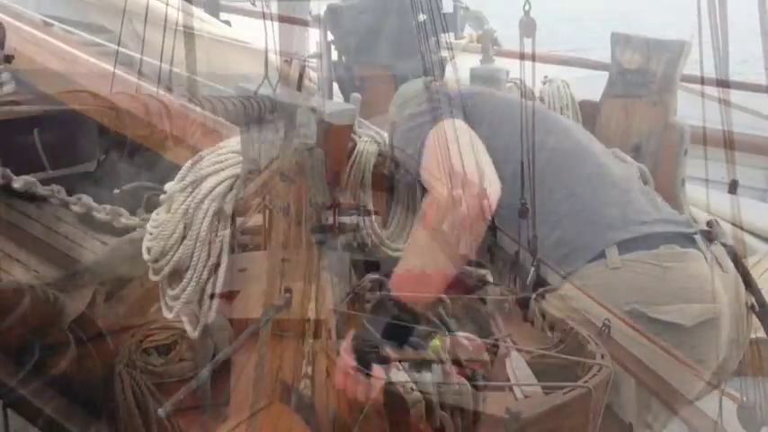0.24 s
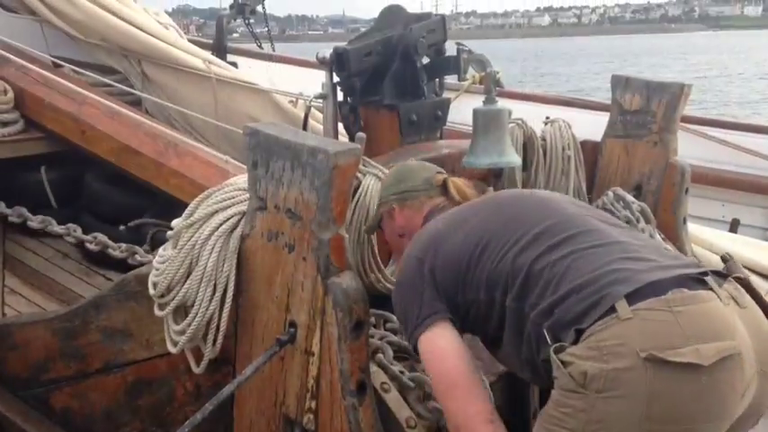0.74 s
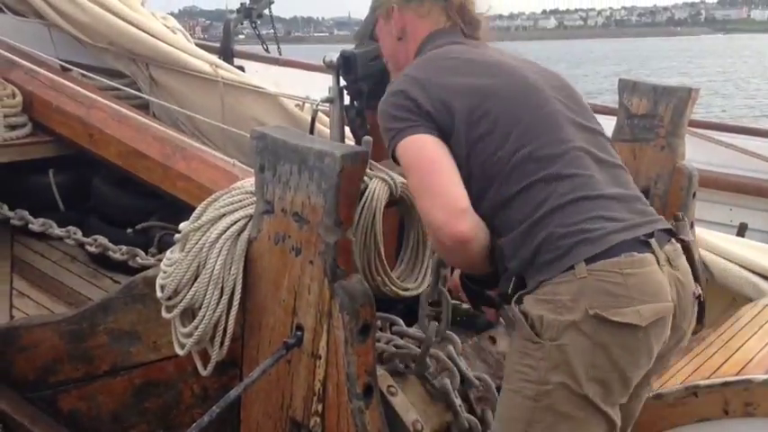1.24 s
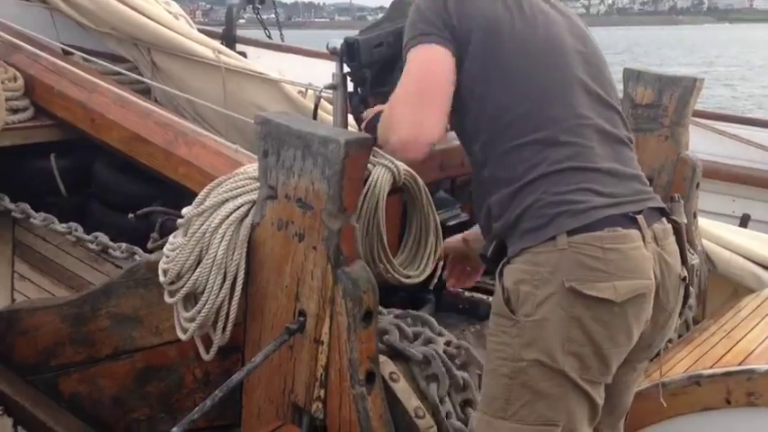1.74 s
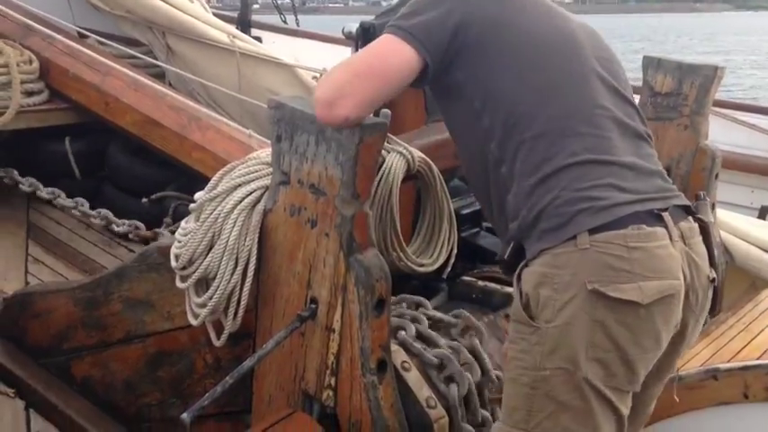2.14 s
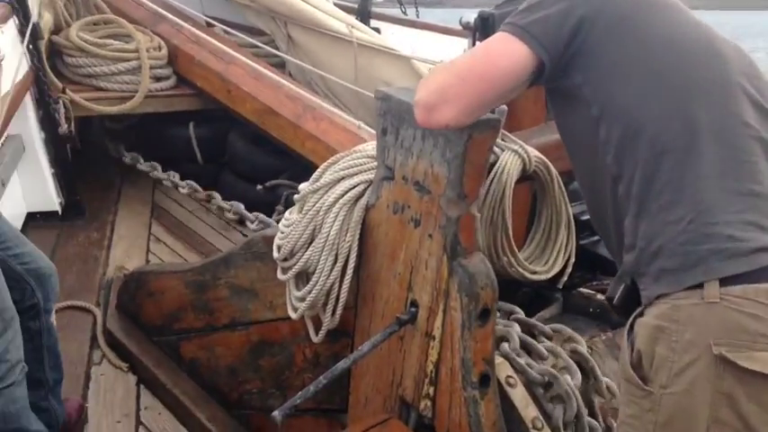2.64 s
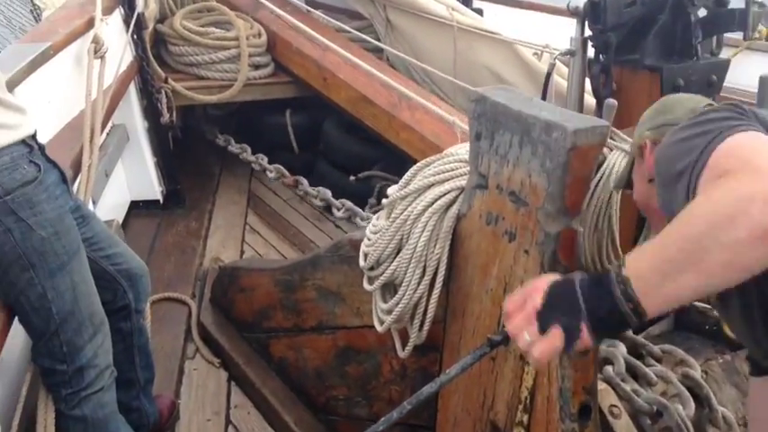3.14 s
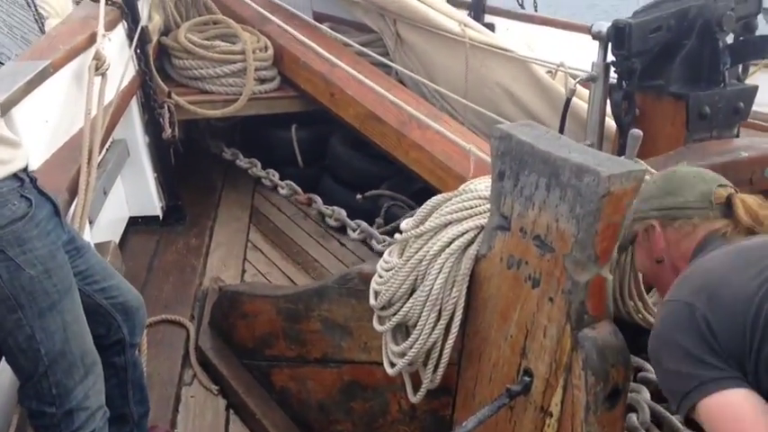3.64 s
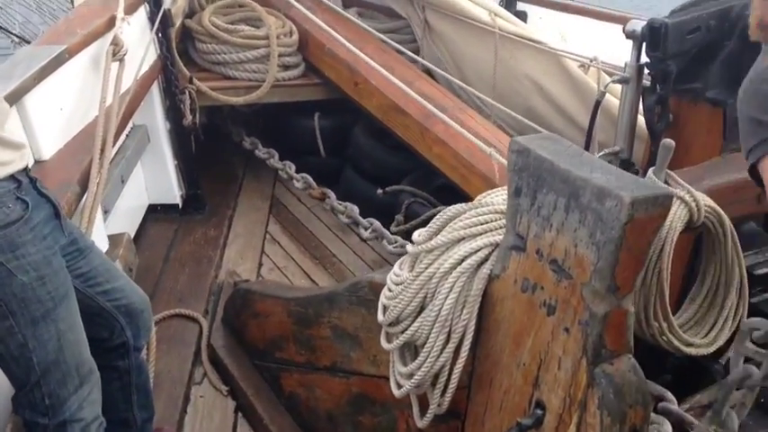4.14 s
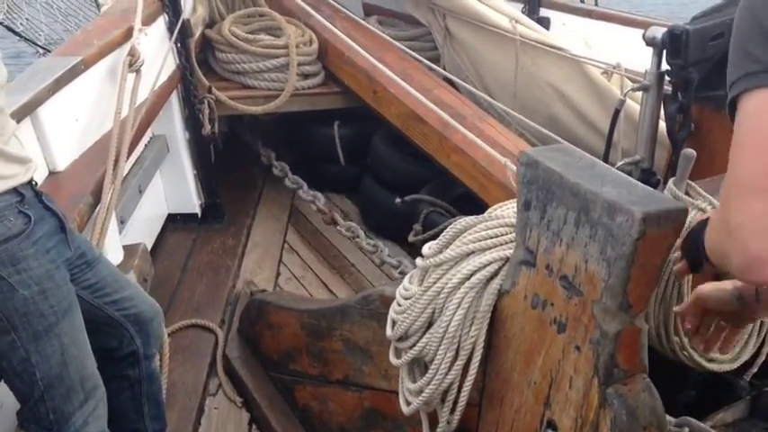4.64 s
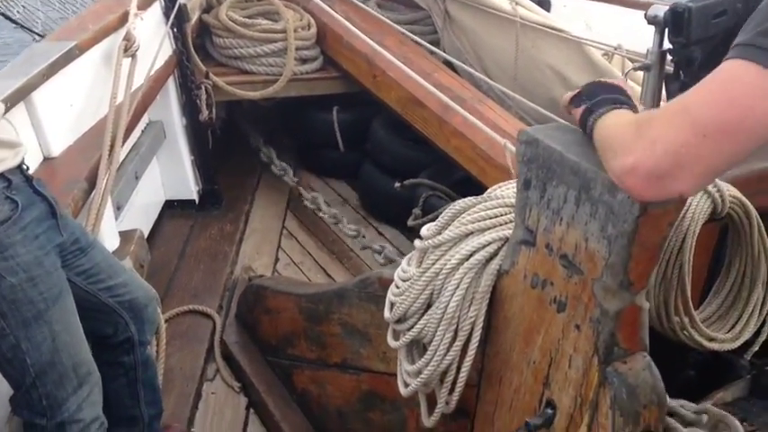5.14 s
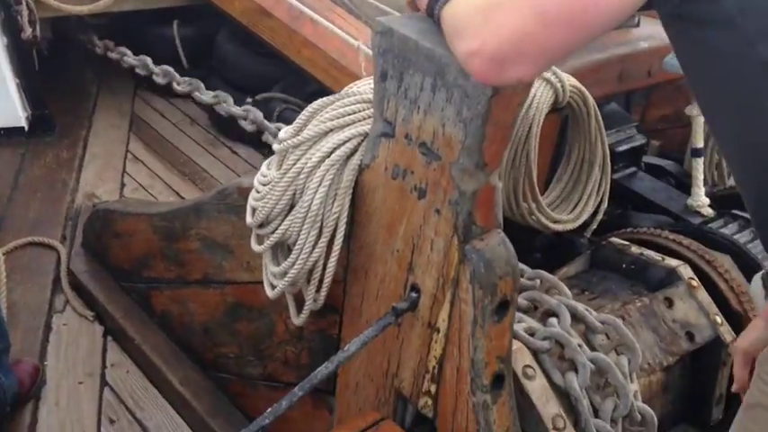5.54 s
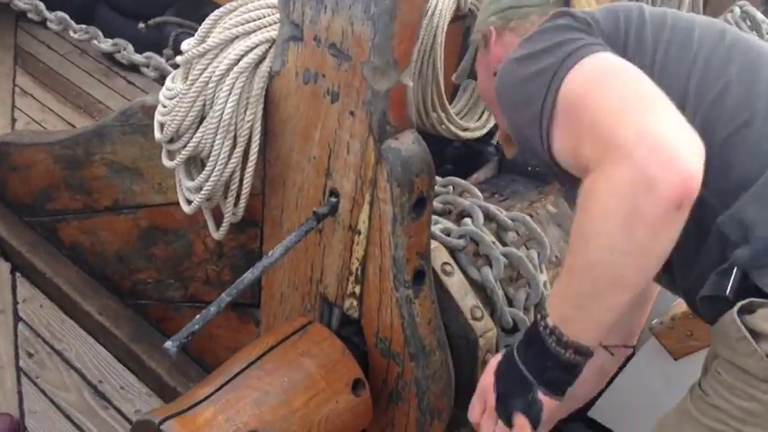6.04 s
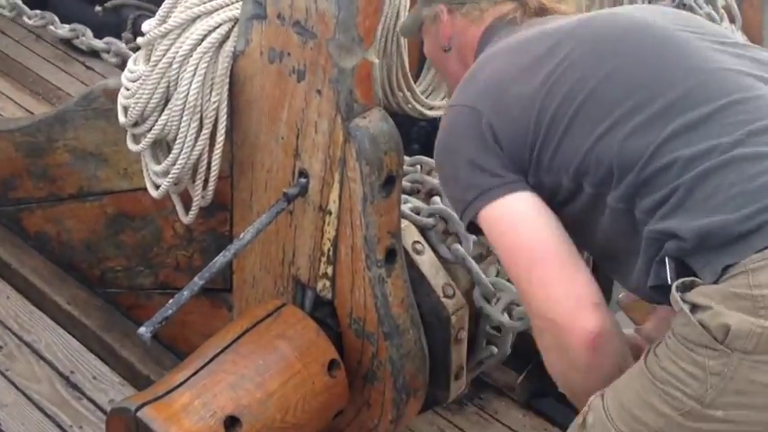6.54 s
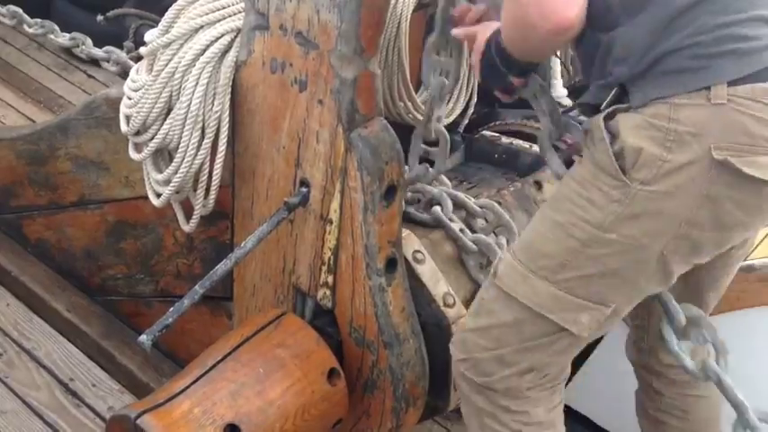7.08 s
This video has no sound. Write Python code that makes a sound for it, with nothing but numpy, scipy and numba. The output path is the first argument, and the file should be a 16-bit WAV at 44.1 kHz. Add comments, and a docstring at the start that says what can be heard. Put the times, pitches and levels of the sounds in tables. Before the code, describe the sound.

Iron links clash with bright, high, short rings, in irregular clusters broken by pauses. Running chain jingles, scrapes and knocks on wood, with low thumps beneath. The loudest, heaviest clatter comes past the middle, then a gap, a bright cluster of clanks, and a last clank at the end. Close microphone outdoors; soft low wind and water and a barely audible idling engine continue throughout.

```python
"""Iron links clank and ring near 5 kHz, each tuned a little apart, heard close up: heavy chain hauled by hand
over the wooden barrel of a windlass on a ship's foredeck. Running chain knocks on barrel and deck planks;
low thumps fall between, and an idling engine hums below deck under wind and water. Links, planks, barrel and
hull are fading sine modes, rough contacts are short noise bursts, thumps are enveloped swings, wind and water
are coloured noise."""
import sys
import numpy as np
from scipy import signal
from scipy.fft import rfft, irfft, next_fast_len
from scipy.io import wavfile
from scipy.ndimage import uniform_filter1d, minimum_filter1d
from numba import njit

SR = 44100
rng = np.random.default_rng(int(sys.argv[2]) if len(sys.argv) > 2 else 0)


def pcm_store(signal):
    """Save signal as 16-bit PCM."""
    levels = np.round(np.clip(np.atleast_2d(signal), -1, 1) * 32767)
    wavfile.write(sys.argv[1], SR, levels.astype(np.int16).T)


N = 322371

# Colour of iron meeting iron. Each row: frequency in Hz, relative density in dB per Hz.
IRON_COLOUR = [(300, -20), (900, -5.5), (1500, 5), (2500, -6.5), (3400, 2), (5000, -7.5), (6500, -9),
               (9000, -24.5), (13000, -26.5), (15500, -42)]
# Colour of iron scraping on wood. Each row: frequency in Hz, relative density in dB per Hz.
SCRAPE_COLOUR = [(150, -3.5), (480, -2), (800, 3), (1700, -5), (2500, -12), (4000, -16), (8000, -30),
                 (15500, -32)]
# Modes of the deck planks. Each row: nominal frequency in Hz, relative level in dB, t60 in seconds.
DECK_MODES = [(105.2, -10.5, 0.18), (143, -8.5, 0.3), (212.3, 1, 0.14), (270, 0, 0.1), (335, 0.5, 0.072),
              (402.6, 2, 0.13), (483.4, -2.5, 0.089), (662, -6.5, 0.073)]


def clanks():
    """Single links meeting: one loud ring, the other modes around it, a sharp crack and its duller tail."""
    # Each row: start in seconds, level in dB, loudest ring in Hz, then relative levels in dB (trimmed below)
    # of crack, upper rings and lingering ring.
    clank_rows = [(0.056, -14, 4950, -9, -7, -20), (0.1193, -15, 5230, -6.5, -28, -15),
                  (0.1675, -17, 5140, -34, -21, -12), (0.6537, -30.5, 4890, -9, -32, -29),
                  (0.682, -36, 4890, -1.5, -18, -24), (0.7493, -4, 4956, -17.5, -19, -25),
                  (0.7896, -3, 4870, -14.5, -15.5, -29), (1.3067, -34, 4720, -4, -25, -15),
                  (1.4012, -28.5, 4660, -2.5, -14.5, -26), (1.5284, -23.5, 4880, 2, -8, -16),
                  (1.5364, -15, 4530, -16, -20, -17), (1.5897, -29.5, 4300, 11.5, 4.5, -32),
                  (1.6154, -23, 4650, 3, -2.5, -18), (1.6465, -12.5, 5290, -16, -23, -15.5),
                  (1.7262, -4, 4700, -12, -17.5, -20), (1.744, -14.5, 5330, -20, -13, -16),
                  (1.7735, -2.5, 5220, -23.5, -15, -19), (1.8362, -6.5, 4830, -8.5, -3.5, -17.5),
                  (1.895, -1, 4740, -30, -24, -20), (1.974, -1.5, 4690, -38, -13, -19.5),
                  (2.082, -13, 4820, -24, -20.5, -6.5), (2.1233, -11.5, 4880, -17, -23, -12.5),
                  (2.2828, -19.5, 4770, -10, -34, -28), (2.308, -21.5, 4840, -4, -34.5, -13.5),
                  (2.342, -25, 4870, 5.5, -10, -20.5), (2.4055, -21, 5400, -1.5, -18, -9),
                  (2.4533, -7, 5290, -20, -13, -11.5), (2.493, -7.5, 4950, -13, -16, -22),
                  (2.5673, -19, 4850, -6.5, -12.5, -8.5), (2.6, -5, 4860, -10.5, -13, -17),
                  (2.6545, -18, 5340, -8.5, -22, -26), (2.6755, -7, 4770, -17.5, -21, -21.5),
                  (2.7069, 2, 5030, -25.5, -23.5, -27.5), (2.7337, -11, 4970, -8, -12, -20.5),
                  (3.4157, -18, 4700, -13, -26, -11), (3.4937, -23.5, 5130, -4, -38, -29),
                  (3.536, -30, 4550, -12, -33, -20), (3.5583, -19.5, 4760, -12, -33, -30),
                  (3.5987, -27, 4540, -5.5, -24, -19.5), (3.6543, -25.5, 4920, -0.5, -22, -20),
                  (3.6859, -25.5, 4650, 1.5, -28, -18), (3.7192, -0.5, 5220, -21, -18, -25.5),
                  (3.7682, -16.5, 4870, -11.5, -34, -16.5), (3.8036, -7.5, 5460, -18, -22, -17),
                  (3.8619, -6.5, 5390, -12, -7, -21.5), (3.8986, -7, 5190, -18, -14, -26),
                  (3.9454, -25.5, 4930, -3, -29, -20), (3.9996, -26, 5130, -3, -15, -20),
                  (4.0518, -16, 5340, -10, -19, -32), (4.2233, -27, 4670, -0.5, -1, -22),
                  (4.2553, -17, 4830, -7.5, -11, -23), (4.277, -18, 5040, -16, -19, -9),
                  (4.4191, -11, 5090, -12.5, -18.5, -21.5), (4.4628, -21.5, 4930, -1, -12, -21),
                  (4.4949, -22, 4720, -11, -21, -18.5), (4.576, -14.5, 5100, -7, -15.5, -22.5),
                  (4.6194, -10.5, 4590, -35.5, -28, -19), (4.6435, 2, 4600, -28, -20.5, -16),
                  (4.714, -8.5, 4870, -23, -5.5, -20), (4.791, 9, 4810, -22.5, -10.5, -22),
                  (4.8479, 5, 4740, -18.5, -25, -19.5), (4.9094, -10, 4860, -23, -17, -8),
                  (5.1212, -21.5, 4700, -8, -28, -20), (5.1303, -19, 5370, -16, -18.5, -15),
                  (5.1615, -16, 4910, -5.5, -12, -11), (5.254, -15, 5080, -8, -14.5, -18),
                  (5.3048, -10.5, 4820, -8, -20, -23), (5.4247, -25, 5100, -1.5, -14, -20),
                  (5.4884, -5.5, 4900, -12.5, -16.5, -16), (5.5089, -8.5, 5010, -6.5, -15.5, -30),
                  (5.5724, -21, 4800, -33, -37, -11), (6.2341, -17, 4970, -9.5, -26, -18),
                  (6.3707, -9.5, 4775, -11.5, -26.5, -13), (6.3959, 0, 4784, -27, -28, -19),
                  (6.4498, -12.5, 5100, -8.5, -8, -7), (6.528, -3.5, 4770, -16, -16, 0),
                  (6.54, 0, 4640, -30.5, -27, -13), (6.5644, 2.5, 4820, -30, -17.5, -35),
                  (6.627, -12.5, 4480, -23, -35, -18), (6.6658, -14.5, 5070, -10, -3, -28),
                  (6.6903, -16.5, 5030, -24, -32, -37), (6.773, -2.5, 4440, -20, -9, -29),
                  (7.0093, -38.5, 4960, -0.5, -26, -20), (7.0355, -27.5, 4520, -12, -39, -5),
                  (7.0832, -22, 4520, -12.5, -11, -23), (7.191, -20, 4530, -13, -22, -8.5),
                  (7.2931, -1.5, 4770, -21, -22, -22)]
    s, db, hz, crack_db, upper_db, linger_db = np.transpose(clank_rows)
    t60_s = 0.046
    main = rings(s, hz, undb(db - 5), 1.3 * t60_s, rise_s=0.0012)
    crack = bursts(s, db + crack_db + 1.5, IRON_COLOUR, t60_s=0.045, rise_s=0.00042)
    tail = bursts(s, db + crack_db - 28.5, SCRAPE_COLOUR, t60_s=0.086, rise_s=0.005)

    # each lingering ring is a pair of modes, one either side of the middle of the ring band
    middle_hz, apart_hz, jitter_hz = 4990, 259, 50
    partner_hz = middle_hz + apart_hz * np.sign(middle_hz - hz) + jitter_hz * rng.standard_normal(len(s))
    pair_hz = np.transpose([hz, partner_hz])
    linger = rings(s[:, None], pair_hz, undb(db + linger_db)[:, None], 0.18, rise_s=0.0016)

    damping = np.full(len(s), t60_s / 0.11)
    other = links(s, db - 9.5, upper_db + 25.5, damping, spread=0.02, uneven_db=6.7)
    return main + linger + other + crack + tail


def links(s, db, upper_db, damping, spread, uneven_db, count=3):
    """Every link is forged a little differently, so its modes shift; a blow travels on to the next links."""
    # Modes of one link. Each row: nominal frequency in Hz, relative level in dB, t60 in seconds before damping.
    link_modes = [(4336, -16, 0.077), (4570, -16.5, 0.035), (4844, 0.5, 0.055), (5175, -8, 0.12),
                  (5430, -17.5, 0.043), (7800, -25, 0.047), (8050, -21.5, 0.049), (9400, -43, 0.19),
                  (10450, -28.5, 0.046), (11040, -32.5, 0.12), (11760, -30.5, 0.14), (12420, -35.5, 0.03),
                  (12700, -35, .04)]
    hz, mode_db, t60_s = np.tile(np.transpose(link_modes), count)
    chance = rng.standard_normal((len(s), len(hz), 3))
    upper = hz > 6500
    gain = undb(db[:, None] + mode_db + uneven_db * chance[..., 1] + upper * upper_db[:, None])
    late_s = 0.003 * chance[..., 2] ** 2
    # a link hanging free rings on in its lower modes only
    t60_s = t60_s * np.where(upper, np.minimum(damping, 1)[:, None], damping[:, None])
    return rings(s[:, None] + late_s, hz * (1 + spread * chance[..., 0]), gain, t60_s, rise_s=0.00013)


def running():
    """Many small contacts while chain slides: links jingle, iron scrapes on wood, hull booms, deck rumbles."""
    # Modes of the hull. Each row: nominal frequency in Hz, relative level in dB, t60 in seconds.
    hull_modes = [(62, -10.5, .15), (89, 8, 0.11), (126, 3.5, 0.15)]
    s, db = scatter(column=2, rate_hz=420, spread_db=-2.0)
    upper_db, damping = np.full(len(s), 7.0), np.full(len(s), 1.35)
    jingle = links(s, db + 21.5, upper_db, damping, spread=0.044, uneven_db=5.36, count=1)
    jingle += bursts(s, db + 14.5, IRON_COLOUR, t60_s=0.028, rise_s=0.0005)

    s, db = scatter(column=3, rate_hz=300, spread_db=5)
    scrape = bursts(s, db + 24.5, SCRAPE_COLOUR, t60_s=0.042, rise_s=0.0015)
    boom = wood(hull_modes, s, db + 10.5, spread=0.1)

    s, db = scatter(column=4, rate_hz=320, spread_db=2.5)
    rumble = wood(DECK_MODES, s, db + 9.5, spread=0.1265)
    return jingle + scrape + boom + rumble


def scatter(column, rate_hz, spread_db):
    """Random contacts whose mean power follows the slides; spread_db > 0 makes a few far harder, < 0 softer."""
    # Each row: start in seconds, length in seconds, then relative levels in dB of link rattle,
    # scrape on the barrel and deck rumble.
    slide_rows = [(0.0, .05, -26.5, -41, -24), (0.045, 0.17, -22, -27.5, -8), (0.193, 0.085, -23, -34, -11),
                  (0.459, 0.13, -59, -48, -41), (0.645, 0.4, -56.5, -49, -45.5),
                  (1.122, 0.51, -63.5, -49, -37.5), (1.509, 0.21, -36.5, -32.5, -22.5),
                  (1.726, 0.25, -13.5, -28.5, -10.5), (1.988, 0.35, -36.5, -36.5, -31),
                  (2.317, 0.22, -43.5, -28, -25), (2.583, 0.18, -53, -26, -23.5),
                  (3.466, 0.26, -49.5, -45, -37.5), (3.642, 0.25, -35.5, -43, -53),
                  (4.207, 0.19, -42.5, -36.5, -26.5), (4.449, .08, -39, -32, -23),
                  (4.514, 0.14, -37, -32, -11), (4.612, 0.29, -14.5, -36.5, -11),
                  (4.977, 0.079, -33.5, -30.5, -21.5), (5.113, 0.055, -39, -27.5, -25.5),
                  (5.193, .16, -35, -25.5, -24), (5.393, .16, -45, -27.5, -25),
                  (5.57, 0.045, -54.5, -49.5, -27.5), (6.367, .33, -34.5, -55, -66),
                  (6.871, 0.083, -57, -48.5, -35.5), (7.005, .06, -48, -45.5, -32),
                  (7.098, 0.13, -55, -38, -22), (7.183, 0.05, -38, -34.5, -13.5),
                  (7.264, .05, -54, -38.5, -23)]
    chance = rng.random((int(rate_hz * N / SR), 2))
    s = chance[:, 0] * N / SR
    size = undb(-spread_db * np.log(1 - 0.98 * chance[:, 1]))
    start, length, level_db = np.array(slide_rows)[:, [0, 1, column], None].transpose(1, 0, 2)
    # climbs 20 dB per 18 ms up to its start, holds, then dies away at a steady rate
    early_db = 20 * np.maximum(start - s, 0) / 0.018
    fade_db = 294 * np.maximum(s - start - length, 0)
    db = np.max(level_db - early_db - fade_db, axis=0)
    return s, db + 20 * np.log10(size / np.sqrt(rate_hz * np.mean(size ** 2)))


def knocks():
    """Links dropping on the barrel: a rough, dull burst, the barrel's ring and a brighter edge."""
    # Each row: start in seconds, level in dB, edge in dB relative to that level.
    knock_rows = [(0.052, -6.5, -34), (0.857, -42.5, 8.5), (1.099, -43.5, 0.5), (1.246, -31.5, -30),
                  (1.385, -33, -2.5), (1.731, -5.5, -26), (1.972, -27, -8.5), (2.212, -24.5, -36),
                  (2.233, -17.5, -34), (2.341, -16.5, -15.5), (2.409, -10.5, -36), (2.619, -9.5, -22.5),
                  (2.654, -22, -20), (2.755, -16.5, -3), (3.609, -32.5, -13), (4.225, -26.5, 4),
                  (4.323, -28, -22), (4.551, -14.5, -14), (4.609, -7.5, -35), (4.676, -15, -8),
                  (4.841, -8.5, -16), (4.925, -20.5, -1.5), (5.022, -19.5, -20), (5.212, -24.5, -8),
                  (5.301, -9.5, -12.5), (5.41, -20, -20), (5.433, -19.5, -7.5), (5.507, -6, -39),
                  (5.632, -32.5, -30), (5.7, -28, -24), (5.886, -31, -38), (6.34, -36, -4),
                  (6.839, -46, 12.5), (6.903, -48.5, 6), (7.074, -36, 2.5), (7.102, -41.5, 9.5),
                  (7.223, -36, 2.5)]
    # Colour of a link dropping on the barrel. Each row: frequency in Hz, relative density in dB per Hz.
    drop_colour = [(200, -7), (500, 4.5), (1200, -3), (1900, -12), (2600, -27.5), (6000, -49)]
    # Modes of the barrel. Each row: nominal frequency in Hz, relative level in dB, t60 in seconds.
    barrel_modes = [(466, -8, 0.11), (690, 4, 0.065), (932, -21.5, 0.045), (1134, 3.5, 0.052),
                    (1789, -1.5, 0.036)]
    s, db, edge_db = np.transpose(knock_rows)
    body = bursts(s, db, drop_colour, t60_s=0.063, rise_s=0.0035)
    ring = wood(barrel_modes, s, db - 6.0, spread=0.025)
    edge = bursts(s, db + edge_db, IRON_COLOUR, t60_s=0.084, rise_s=0.001)
    return body + ring + edge


def thumps():
    """Low thumps, from deck blows, wind pops or bumps of the microphone: a few swings rise to a crest and die.

    Deck modes ring on from each crest."""
    # Each row: crest time in seconds, relative level in dB, pitch in Hz.
    thump_rows = [(0.056, 3, 410), (0.081, -2, 320), (0.101, 5.5, 360), (0.483, -17, 150),
                  (0.506, -13.5, 128), (0.539, -13, 130), (1.138, -23, 140), (1.193, -18, 180),
                  (1.235, -15.5, 145), (1.252, -3.5, 260), (1.319, -3, 300), (1.337, -18, 200),
                  (1.4, -15, 120), (1.571, -13, 500), (1.725, 6.5, 320), (1.795, 3, 350),
                  (1.857, -7.5, 250), (2.001, -9, 300), (2.427, -16, 350), (2.742, -18.5, 190),
                  (4.015, -22, 163), (4.209, -18, 200), (4.227, -12.5, 230), (4.334, -5.5, 220),
                  (4.345, -11.5, 120), (4.537, -11, 320), (4.553, -3, 350), (4.576, 2, 330),
                  (4.616, -3, 380), (4.639, -6.5, 140), (4.707, -11, 330), (4.823, -1.5, 350),
                  (4.844, 1.5, 360), (4.937, -5, 260), (5.026, -13, 460), (5.305, -16, 550),
                  (5.512, -10.5, 600), (7.195, -15, 350), (7.232, -20, 330), (7.248, -17, 350),
                  (7.3, -9, 370)]
    s, db, hz = np.transpose(thump_rows)
    half = SR // 16
    out, t = np.zeros(N + 2 * half), np.arange(-half, half) / SR
    turn_rad = rng.standard_normal(len(s))
    for k in range(len(s)):
        width_s = 0.79 / hz[k] * np.where(t < 0, 0.45, 0.7)
        shape = np.exp(-np.abs(t / width_s) ** 1.3)
        swing = np.cos(2 * np.pi * hz[k] * t + turn_rad[k])
        out[int(s[k] * SR):][:2 * half] += undb(db[k] + 4) * shape * swing
    return out[half:N + half] + wood(DECK_MODES, s, db - 20.0, spread=0.05)


def wood(modes, s, db, spread):
    """Blows ring the wood, each from another spot: mode levels, signs and pitches vary."""
    hz, mode_db, t60_s = np.transpose(modes)
    chance = rng.standard_normal((len(s), len(modes), 3))
    uneven_db = 3.5 * chance[..., 1]
    gain = undb(db[:, None] + mode_db + uneven_db) * np.sign(chance[..., 2])
    return rings(s[:, None], hz * (1 + spread * chance[..., 0]), gain, t60_s, rise_s=0.0011)


def bursts(s, db, colour, t60_s, rise_s):
    """A rough contact wakes too many short rings to tell apart: a quick noisy burst for each."""
    power = np.bincount(np.clip(s * SR, 0, N - 1).astype(int), undb(2 * db), N)
    fade_pole, rise_pole = 1000 ** (-2 / (t60_s * SR)), np.exp(-1 / (rise_s * SR))
    for pole in (fade_pole, rise_pole):
        power = signal.lfilter([1], [1, -pole], power)
    return np.sqrt(power / (rise_s * SR)) * coloured(colour)


def coloured(colour):
    """Noise of rms 1, its spectrum drawn through the colour's points over log frequency."""
    size = next_fast_len(N)
    hz = np.arange(size // 2 + 1) * SR / size + 1
    point_hz, point_db = np.transpose(colour)
    gain = undb(np.interp(np.log(hz), np.log(point_hz), point_db))
    noise = irfft(rfft(rng.standard_normal(size)) * gain, size)[:N]
    return noise / noise.std()


def rings(s, hz, gain, t60_s, rise_s):
    """Sum of fading modes, one row of modes per blow."""
    out = np.zeros(N)
    columns = np.broadcast_arrays(s, hz, gain, t60_s)
    s, hz, gain, t60_s = (np.ascontiguousarray(a, float).ravel() for a in columns)
    add(out, s, np.clip(hz, 20, 0.45 * SR), gain, np.clip(t60_s, 0.003, 0.4), rise_s)
    return out


@njit
def add(out, s, hz, gain, t60_s, rise_s):
    """Adds fading sines as turning phasors; each swells over its contact time."""
    for k in range(len(s)):
        step = np.exp(2j * np.pi * hz[k] / SR - np.log(1000) / (t60_s[k] * SR))
        z, i0, on = gain[k] + 0j, int(s[k] * SR), 0.
        for i in range(max(i0, 0), min(i0 + int(t60_s[k] * SR), len(out))):
            on += (1 - on) / (1 + rise_s * SR)
            out[i] += on * z.imag
            z *= step


def undb(db):
    """Decibels to gain."""
    return 10 ** (np.asarray(db) / 20)


def surroundings():
    """Wind and water, coloured noise, swell and flicker a little; the engine's firing tones, sines, waver."""
    # Each row: nominal frequency in Hz, mean level in dB rms.
    engine_tones = [(48.5, -56.5), (97, -54.5), (194, -59), (291, -61)]
    # Colour of wind and water. Each row: frequency in Hz, relative density in dB per Hz.
    air_colour = [(25, -36.5), (45, -5.5), (100, -8), (200, -21.5), (400, -24.5), (900, -32.5),
                  (1600, -37.5), (2500, -50), (6000, -55.5), (15500, -57.5)]
    # Swell of wind and water. Each row: time in seconds, level in dB before the flicker.
    swell_points = [(0, -38), (1.5, -39.5), (2.9, -42.5), (3.3, -38), (4.1, -39), (5.9, -37), (7.31, -44.5)]
    # one shared phase keeps the tones in step
    turn = 2 * np.pi * np.cumsum(1 + 0.00967 * walk(8.9)) / SR
    engine = np.zeros(N)
    for hz, db in engine_tones:
        engine += np.sqrt(2) * undb(db + 2.1 * walk(23)) * np.sin(hz * turn)
    swell_db = np.interp(np.arange(N) / SR, *np.transpose(swell_points))
    flicker_db = 2 * walk(8)
    return coloured(air_colour) * undb(swell_db + flicker_db) + engine


def walk(rate_hz):
    """Random levels held for 1 / rate_hz seconds, smoothed by two running means as long."""
    k = int(SR / rate_hz)
    held = np.repeat(rng.standard_normal(N // k + 1), k)
    return uniform_filter1d(uniform_filter1d(held, k), k)[:N]


def scene():
    """Deck, posts and bulwarks throw the sound back, as decaying noise, within a tenth of a second."""
    echo_db, echo_t60_s = -9.5, 0.16
    chain = clanks() + knocks() + thumps() + running()
    t = np.arange(1, 4000) / SR
    echo = rng.standard_normal(len(t)) * 1000 ** (-t / echo_t60_s)
    wet = signal.fftconvolve(chain, echo / np.sqrt(np.sum(echo ** 2)))[:N]
    return (chain + undb(echo_db) * wet + surroundings())[None]


def record(dry):
    """The microphone loses deep bass and treble, a limiter holds the loudest peaks, and the top is cut."""
    band = signal.butter(2, [36, 13500], "bandpass", fs=SR, output="sos")
    soft = signal.sosfilt(band, dry)
    ceiling = 0.9
    needed = ceiling / np.maximum(np.abs(soft), ceiling)
    gain = uniform_filter1d(minimum_filter1d(needed, size=301), size=151)
    top_cut = signal.ellip(10, 0.2, 80, 15600, fs=SR, output="sos")
    return signal.sosfilt(top_cut, soft * gain)


dry = scene()
out = record(dry)
pcm_store(out)
```